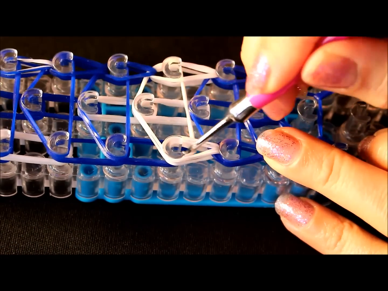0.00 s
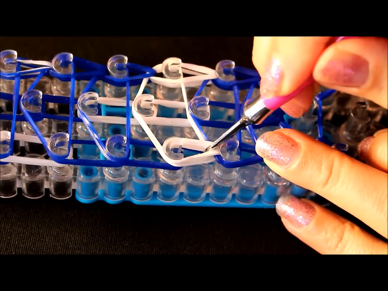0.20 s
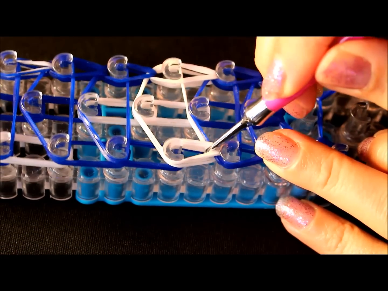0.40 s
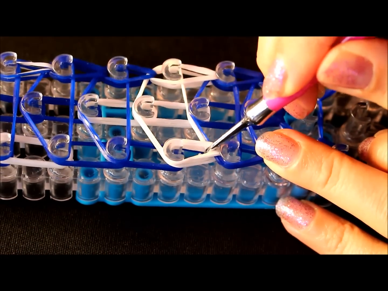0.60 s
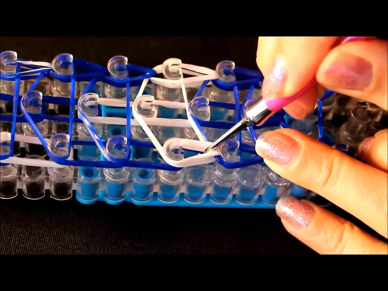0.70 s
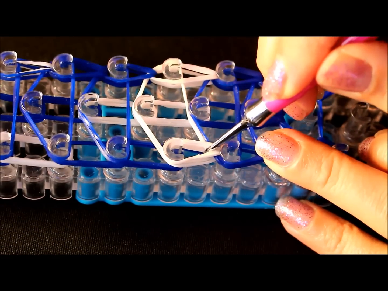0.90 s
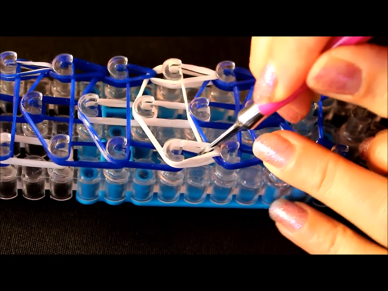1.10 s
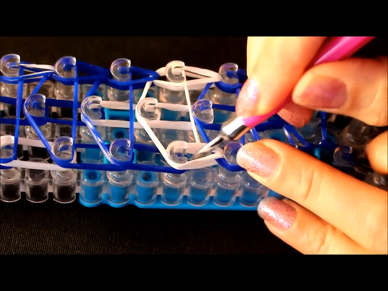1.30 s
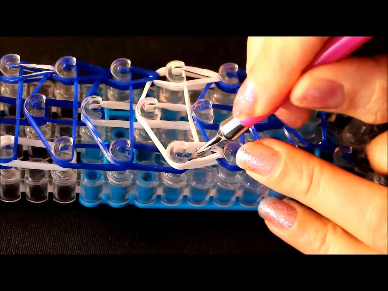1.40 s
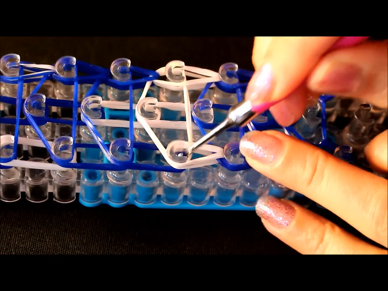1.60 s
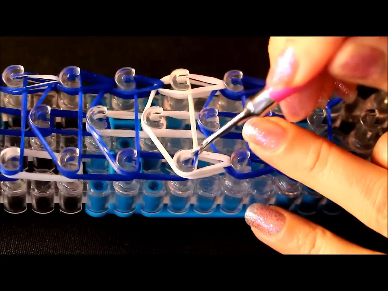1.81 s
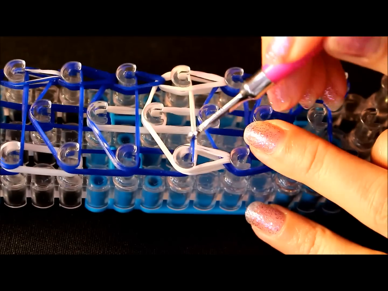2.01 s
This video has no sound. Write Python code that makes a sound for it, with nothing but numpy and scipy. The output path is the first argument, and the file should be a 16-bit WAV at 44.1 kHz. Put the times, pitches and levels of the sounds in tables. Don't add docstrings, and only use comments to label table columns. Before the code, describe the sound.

A metal hook snaps hard off a plastic peg at 0.22 s, bright, dry and by far the loudest, after faint ticks. Dull table thumps and soft loom knocks follow at 0.4-0.6 s, fainter ones near 1.1. Clicks cluster at 1.26-1.57 with a faint rubber-band twang, then tiny creaks from 1.62, a thump at 1.81 and a last tap at 1.98. Small quiet room, close stereo phone, low hum and hiss.

```python
import sys
import numpy as np
from scipy import signal
from scipy.fft import rfft, irfft
from scipy.io import wavfile
from scipy.ndimage import uniform_filter1d

SR = 44100
rng = np.random.default_rng(int(sys.argv[2]) if len(sys.argv) > 2 else 0)


def dump_mix(stems):
    frames = np.atleast_2d(stems).T
    limited = np.clip(frames, -1, 1)
    pcm = np.round(limited * 32767).astype(np.int16)
    wavfile.write(sys.argv[1], SR, pcm)


def makeup_ratio(level_db):
    decades = np.asarray(level_db, float) / 20
    return 10 ** decades


N = 92610

# (frequency [Hz], level [dB rms])
HUM_LINES = [(49.5, -72.5), (97.5, -74.5), (100, -67), (150, -74.5), (200, -70.5), (298, -84.5),
             (400, -74.5)]
# (frequency [Hz], density [dB/Hz])
HISS_MID = [(36, -18), (50, -1), (140, -1.5), (400, -7), (900, -11), (4000, -15.5), (11000, -24),
            (16000, -30.5)]
# (frequency [Hz], density [dB/Hz])
HISS_OPPOSED = [(30, -42), (50, -5.5), (250, -1.5), (500, -3), (1000, -6), (4000, -12.5), (11000, -22),
                (16000, -30)]
# (time [s], level [dB])
BAND_PLUCKS = [
    (1.264, -45),
    (1.277, -46),
    (1.303, -48),
]
# (time [s], length [s], level [dB])
RUBBER_CREAKS = [
    (1.620, .012, -51),
    (1.648, .016, -49),
    (1.672, .01, -53),
    (1.700, .008, -48),
    (1.718, .006, -51),
    (1.730, .006, -48),
    (1.764, .008, -54),
    (1.810, .006, -54),
]
# (time [s], level [dB], tilt [dB/octave])
TABLE_THUMPS = [(0.402, -39, -5), (0.423, -30, -7), (0.455, -32.5, -8), (0.506, -46, -8),
                (0.568, -38, -6.8), (0.603, -51, 2), (1.038, -42, -1.5), (1.072, -46, 0.5),
                (1.091, -42, -2), (1.118, -40, -0.5), (1.151, -50, 3), (1.164, -44.5, -1), (1.336, -42, 6),
                (1.362, -38.5, -4), (1.389, -42, 6.2), (1.416, -58, -15), (1.532, -39, 6.2),
                (1.551, -41, -1.5), (1.569, -36.5, -9), (1.811, -28, -6.5), (1.828, -48, -12),
                (1.861, -48, 0.1)]
# (time [s], level [dB])
HAND_SHOVES = [
    (1.336, -58),
    (1.398, -47.5),
    (1.533, -47),
    (1.811, -47),
]
# (time [s], peg level [dB], rail level [dB], base level [dB])
LIGHT_TAPS = [(.158, -43, -53, -68), (.202, -44.5, -47, -68), (.404, -56, -51, -54), (.425, -54, -41, -44),
              (.450, -50, -40.5, -41.5), (.569, -59, -46.5, -60), (1.040, -72.5, -61, -48),
              (1.121, -59, -52, -52), (1.2626, -41.5, -55, -44), (1.273, -31.5, -35.5, -44),
              (1.294, -44, -59, -47), (1.3374, -37, -33, -35), (1.3648, -35, -39.5, -36.5),
              (1.391, -53, -49, -31.5), (1.404, -65, -55, -37.5), (1.5357, -42.5, -33.5, -41.5),
              (1.574, -46, -53, -52.5), (1.7744, -44.5, -43, -38.5), (1.781, -52, -55, -38.5),
              (1.8046, -52, -55, -44.5), (1.980, -44, -43, -52)]
# (time [s], peg level [dB], body level [dB])
HOOK_SNAP = [
    (.2247, -9.5, -17),
]
BAND_MODES = [(624, 0, .22), (652, -8, .13), (1190, -13, .08)]
# (frequency [Hz], level [dB], T60 [s])
TABLE_MODES = [(131.6, -4.5, 0.31), (187.5, -6, 0.21), (269, -5, .16), (310.6, -8, .16), (404.7, -12, 0.17),
               (494, -17.5, 0.14), (228, -8, 0.16)]
# (frequency [Hz], level [dB], T60 [s])
LEG_MODES = [(55, 0, 0.17), (101, -4.5, .2)]
# (frequency [Hz], level [dB], T60 [s])
PEG_MODES = [(3395, -1, 0.014), (3914, -8.5, 0.021), (4290, -13, 0.023), (5030, -18.5, 0.024),
             (5620, -19.5, 0.014), (6670, -20, .012)]
# (frequency [Hz], level [dB], T60 [s])
RAIL_MODES = [(2270, -3, .04), (2600, -10, .025), (2015, -16, .02), (1745, -14, .025), (2950, -18, .02)]
# (frequency [Hz], level [dB], T60 [s])
BASE_MODES = [(864, -9, 0.064), (1160, -9.5, 0.058), (1454, -9, 0.069), (1140, -22, 0.044),
              (710, -18, 0.046)]
# (frequency [Hz], level [dB], T60 [s])
SNAP_PEG_MODES = [(3690, 2.5, .014), (4050, 3.5, .014), (3880, -20, .04), (4350, -13, .012)]
# (frequency [Hz], level [dB], T60 [s])
SNAP_TIP_MODES = [(4560, -24, .02), (5000, -25, .02), (5770, -21, .015), (7300, -34, .012),
                  (3300, -19, .012)]
# (frequency [Hz], level [dB], T60 [s])
SNAP_BODY_MODES = [(2255, -4, .032), (2570, -8, .03), (2015, -7, .035), (1745, -10, .025),
                   (2950, -10, .015), (1470, -14, .025), (1180, -7, .035), (1000, -12, .03),
                   (620, -20, .04), (404, -14, .07), (300, -12, .06), (265, -15, .06), (190, -21, .2)]

SCATTER_DB, DETUNE_RATIO, RISE_CYCLES, SIDE_DB = 1.5, .02, .7, -15
PEG_DB, RAIL_DB, BASE_DB, TABLE_DB = -1.5, -3, -3.5, -6.5
TICK_DB, TICK_S, SNAP_RATTLE_S = 1, .0027, .005


def walk(rate_hz):
    k = int(SR / rate_hz)
    steps = np.repeat(rng.standard_normal(N // k + 1), k)
    return 1.3 * uniform_filter1d(uniform_filter1d(steps, k), k)[:N]


def coloured(spectrum, level_db):
    hz = np.maximum(np.fft.rfftfreq(N, 1 / SR), 1)
    knot_hz, knot_db = np.array(spectrum).T
    gain = makeup_ratio(np.interp(np.log(hz), np.log(knot_hz), knot_db)) * (hz > 20)
    bins = rfft(rng.standard_normal(N)) * gain
    octave = np.log2(hz / 30)
    noise = np.zeros(N)
    for k in range(-1, 11):
        band = irfft(bins * np.clip(1 - abs(octave - k), 0, 1), N)
        noise += band * makeup_ratio(.35 * walk(9.35))
    return noise * makeup_ratio(level_db) / noise.std()


def hum():
    t = np.arange(N) / SR
    out = np.zeros(N)
    for hz, db in HUM_LINES:
        level = np.sqrt(2) * makeup_ratio(db + 2 * walk(5.2))
        out += level * np.sin(2 * np.pi * (hz * t + rng.random()))
    return out


def floor():
    mid = hum() + coloured(HISS_MID, -58)
    side = makeup_ratio(-10) * hum() + coloured(HISS_OPPOSED, -55.5)
    return np.array([mid + side, mid - side])


def room(dry):
    t = np.arange(SR // 2) / SR
    gap_s, alike = .0045, .5
    noise = rng.standard_normal((3, len(t)))
    noise = (np.sqrt(alike) * noise[0] + np.sqrt(1 - alike) * noise[1:]) * (t > gap_s)
    low = signal.sosfilt(signal.butter(2, 1400, fs=SR, output="sos"), noise)

    def tail(x, db, t60_s):
        rate = np.log(1000) / t60_s
        return x * np.exp(-rate * t) * makeup_ratio(db) * np.sqrt(2 * rate / SR)

    echo = tail(noise - low, -11, .31) + tail(low, -4, .45)
    return signal.fftconvolve(dry.mean(0)[None], echo, axes=1)[:, :N]


def ring(times_s, levels_db, modes, tilts=0., scatter_db=SCATTER_DB, pan_db=0., length_s=.5, rise=RISE_CYCLES):
    out, t = np.zeros((2, N + SR)), np.arange(int(length_s * SR)) / SR
    hz, db, t60_s = np.array(modes).T[:, :, None]
    sign = (-1.) ** np.arange(len(modes))[:, None]
    chance = rng.standard_normal((40, 3, 14, 1))[:, :, :len(modes)]
    pan = makeup_ratio(np.array([[pan_db], [-pan_db]]) / 2)
    tilts = np.broadcast_to(tilts, len(times_s))
    for s, level_db, tilt, (level_draw, pitch_draw, lean) in zip(times_s, levels_db, tilts, chance):
        f = hz * (1 + DETUNE_RATIO * pitch_draw * scatter_db / SCATTER_DB)
        gain = makeup_ratio(level_db + db + scatter_db * level_draw + tilt * np.log2(hz / hz[0])) * sign
        shape = gain * np.exp(-np.log(1000) * t / t60_s) * (1 - np.exp(-t * f / rise))
        mid = (shape * np.sin(2 * np.pi * f * t)).sum(0)
        side = makeup_ratio(SIDE_DB) * (lean * shape * np.cos(2 * np.pi * f * t)).sum(0)
        i = int(s * SR)
        out[:, i:i + len(t)] += np.array([mid + side, mid - side]) * pan
    return out[:, :N]


def burst(times_s, levels_db, decay_s, lo_hz, hi_hz):
    out, t = np.zeros((2, N + SR)), np.arange(SR // 20) / SR
    envelope = np.exp(-t / decay_s) * (1 - np.exp(-t / .0009))
    noise = rng.standard_normal((40, 3, len(t)))
    for s, db, n in zip(times_s, levels_db, noise):
        i = int(s * SR)
        out[:, i:i + len(t)] += makeup_ratio(db) * (n[0] + .68 * n[1:]) * envelope
    band = signal.butter(2, [lo_hz, hi_hz], "band", fs=SR, output="sos")
    return signal.sosfilt(band, out[:, :N])


def twang():
    s, db = np.array(BAND_PLUCKS).T
    return ring(s, db, BAND_MODES, scatter_db=.3, pan_db=4.5)


def creak():
    steps_per_s = 500
    slips = np.zeros(N)
    for start_s, length_s, level_db in RUBBER_CREAKS:
        when, size = rng.random((2, 40))
        steps_s = start_s + (np.cumsum(2 * when) - when[0]) / steps_per_s
        keep = steps_s < start_s + length_s
        slips[(steps_s[keep] * SR).astype(int)] = makeup_ratio(level_db) * (.13 + size[keep])
    peg = ring([0], [0], PEG_MODES[:3], scatter_db=0., length_s=.05)[:, :2400]
    return signal.fftconvolve(slips[None], peg, axes=1)[:, :N]


def table():
    s, db, tilt = np.array(TABLE_THUMPS).T
    shove_s, shove_db = np.array(HAND_SHOVES).T
    return ring(s, db + TABLE_DB, TABLE_MODES, tilt) + ring(shove_s, shove_db, LEG_MODES)


def taps():
    s, peg, rail, base = np.array(LIGHT_TAPS).T
    out = ring(s, peg + PEG_DB, PEG_MODES, length_s=.1)
    out += ring(s, rail + RAIL_DB, RAIL_MODES, length_s=.15)
    out += ring(s, base + BASE_DB, BASE_MODES, pan_db=3.5, length_s=.2)
    out += burst(s, peg + TICK_DB - 1.5, TICK_S, 3100, 5700)
    out += burst(s, rail + TICK_DB - 3, 2 * TICK_S, 2000, 3000)
    return out + burst(s, base + TICK_DB, 4 * TICK_S, 590, 1400)


def snap():
    s, peg, body = np.array(HOOK_SNAP).T
    out = ring(s, peg, SNAP_PEG_MODES, scatter_db=0., rise=5.)
    out += ring(s, body, SNAP_BODY_MODES, scatter_db=0., pan_db=1.5, rise=2.5)
    out += ring(s, peg, SNAP_TIP_MODES, scatter_db=0.)
    out += burst(s, [-36], .002, 5960, 11600)
    out += burst(s, [-23], SNAP_RATTLE_S, 460, 3100)
    out += burst(s, [-25], SNAP_RATTLE_S / 2, 4600, 6400)
    return out + burst(s, [-36], .013, 500, 6500)


def scene():
    dry = twang() + creak() + table() + taps() + snap()
    return dry + room(dry) + floor()


def top_cut(x):
    return signal.sosfilt(signal.butter(12, 15760, fs=SR, output="sos"), x)


def record(dry):
    return top_cut(dry)


dry = scene()
out = record(dry)
dump_mix(out)
```